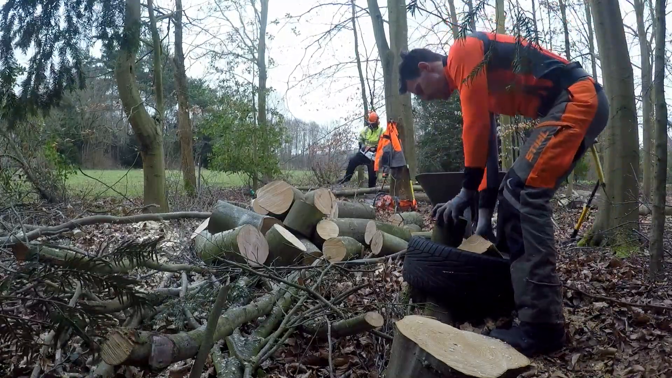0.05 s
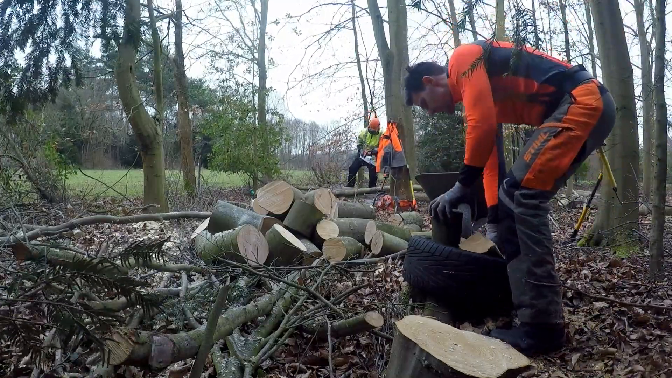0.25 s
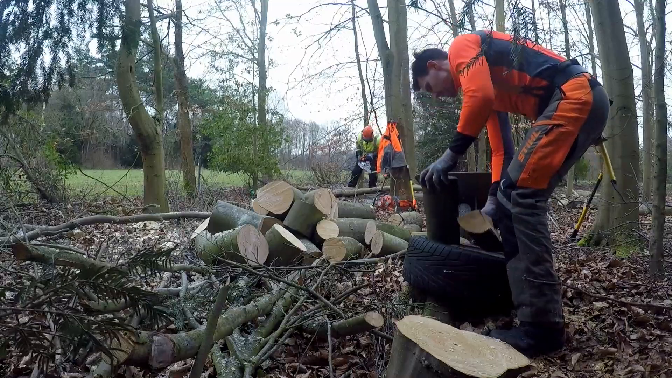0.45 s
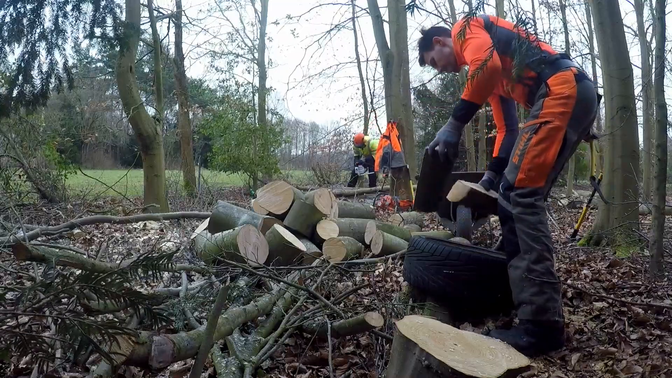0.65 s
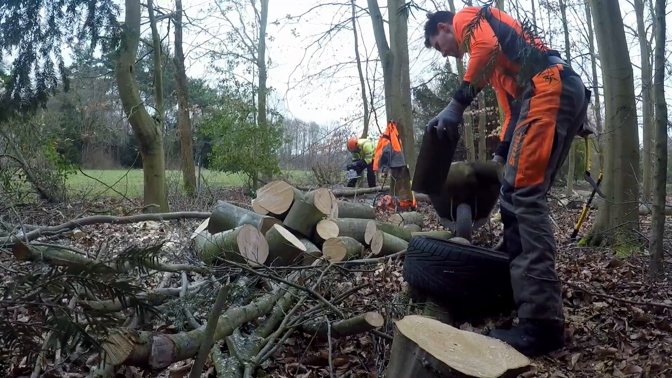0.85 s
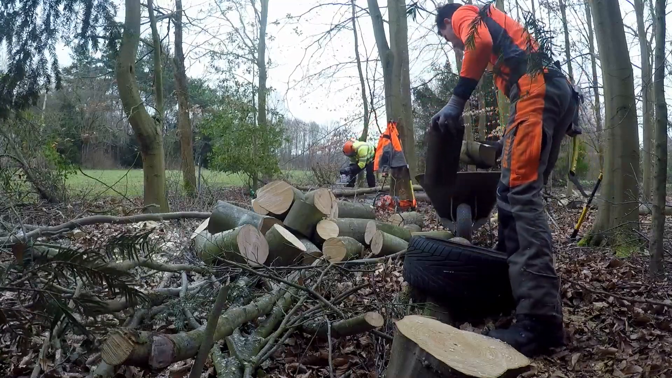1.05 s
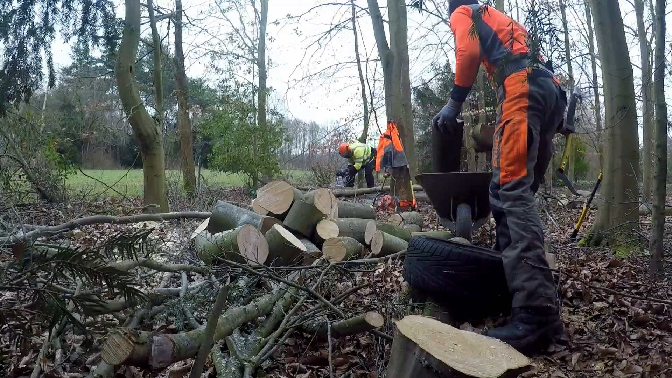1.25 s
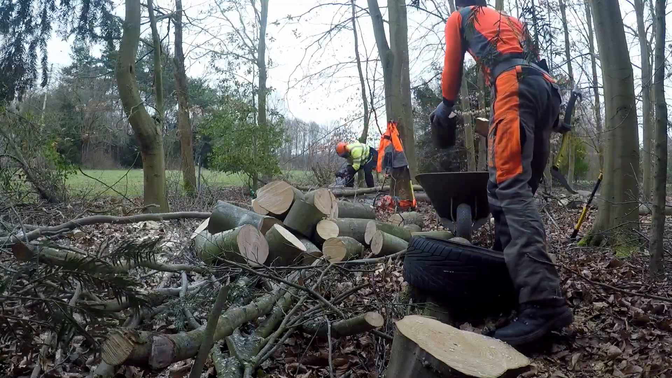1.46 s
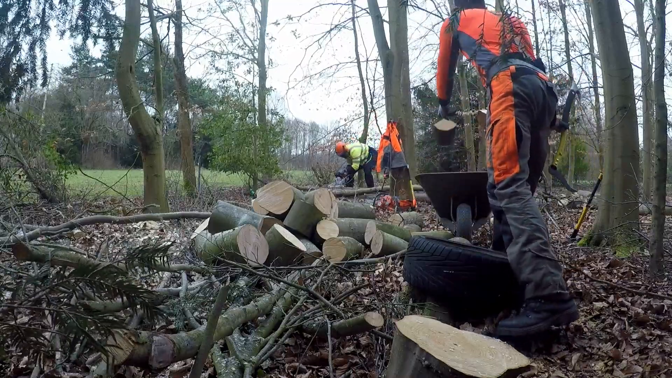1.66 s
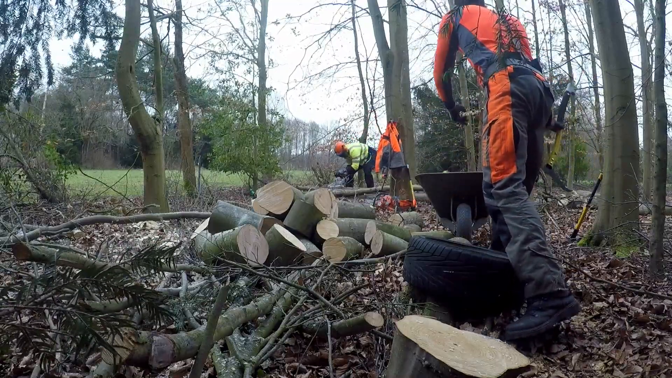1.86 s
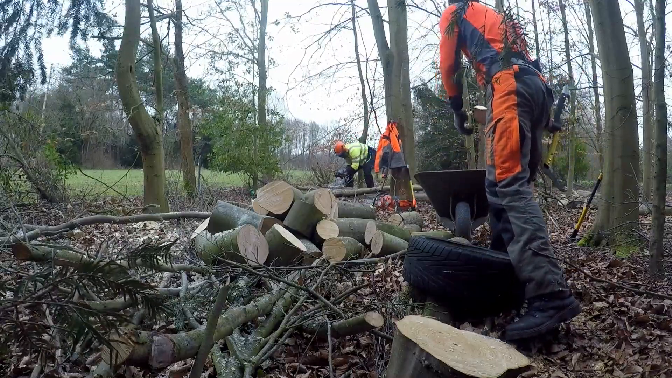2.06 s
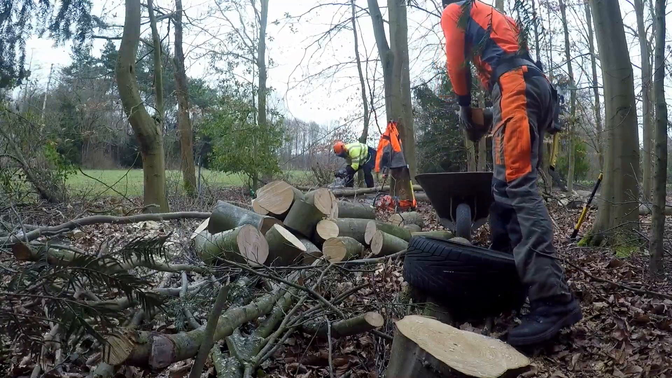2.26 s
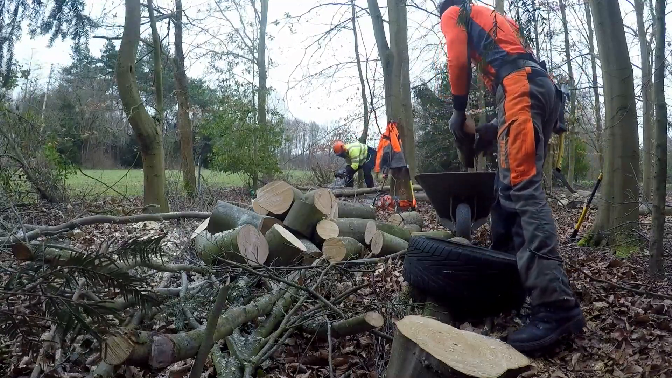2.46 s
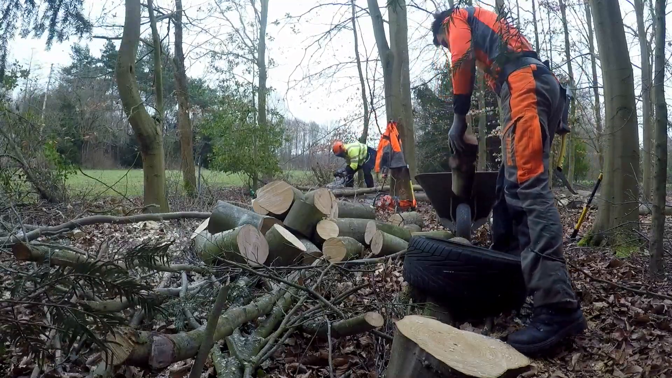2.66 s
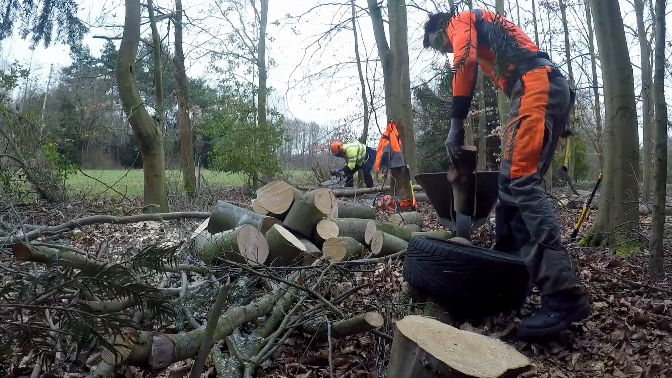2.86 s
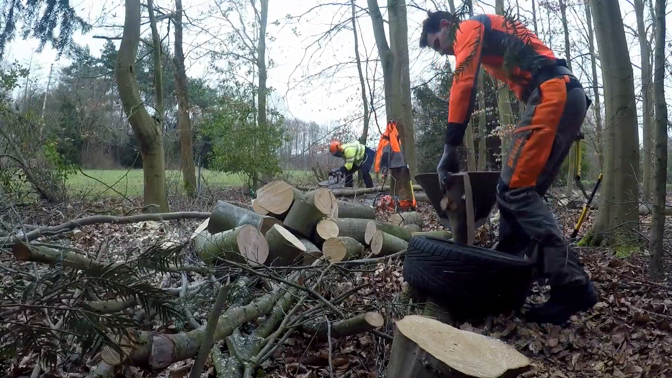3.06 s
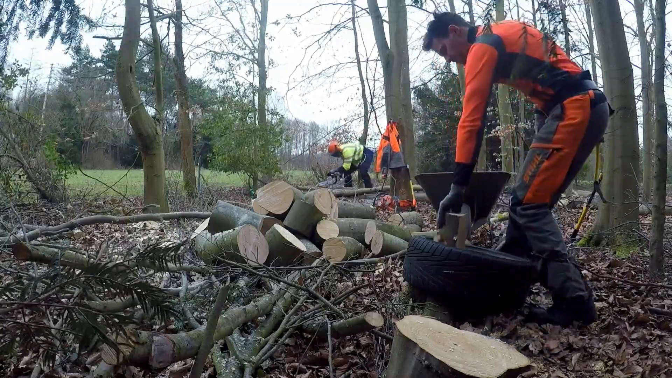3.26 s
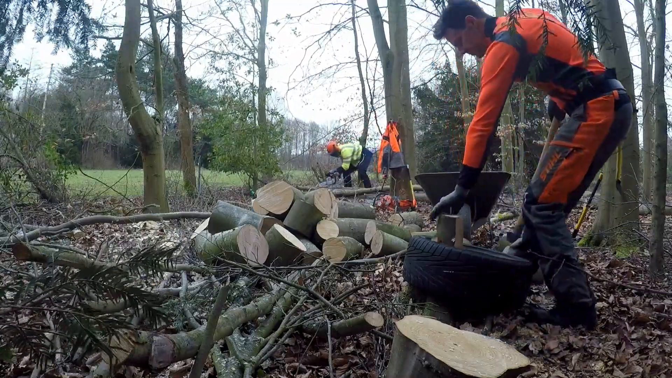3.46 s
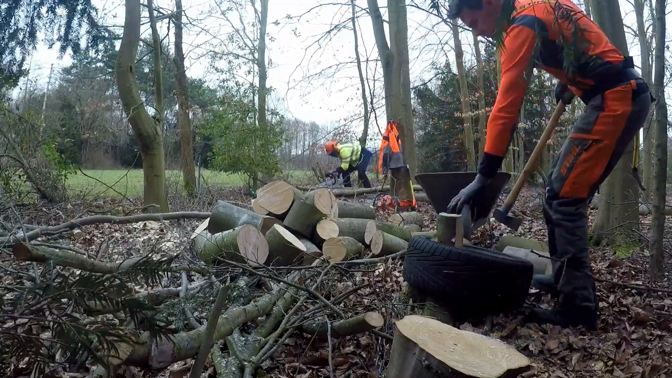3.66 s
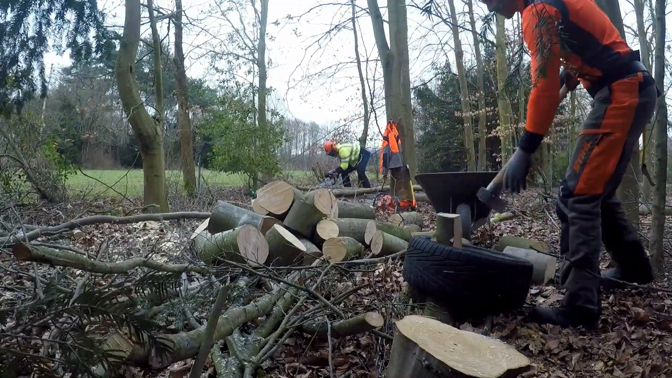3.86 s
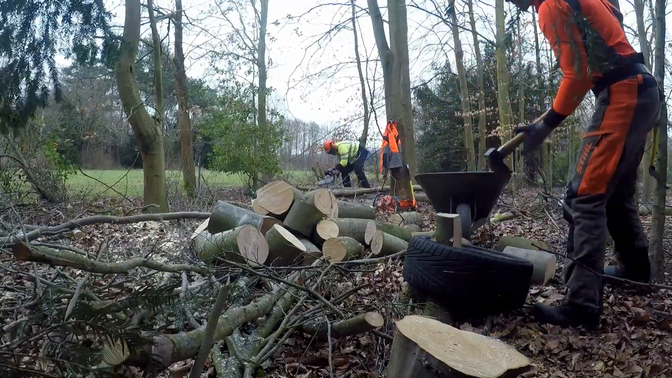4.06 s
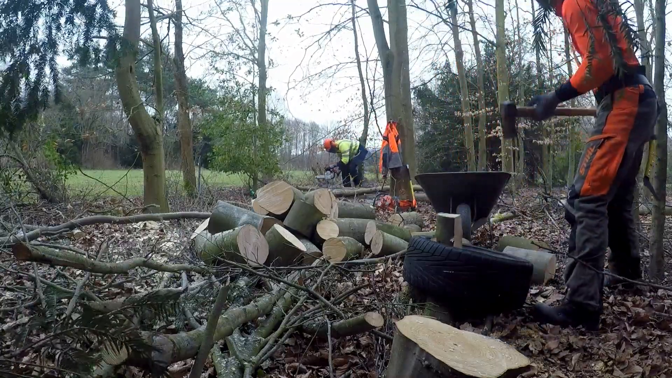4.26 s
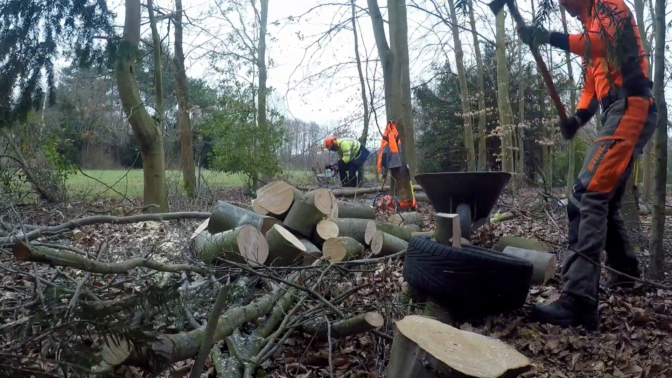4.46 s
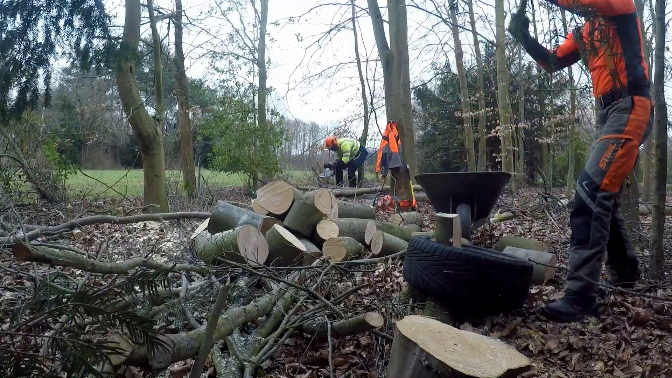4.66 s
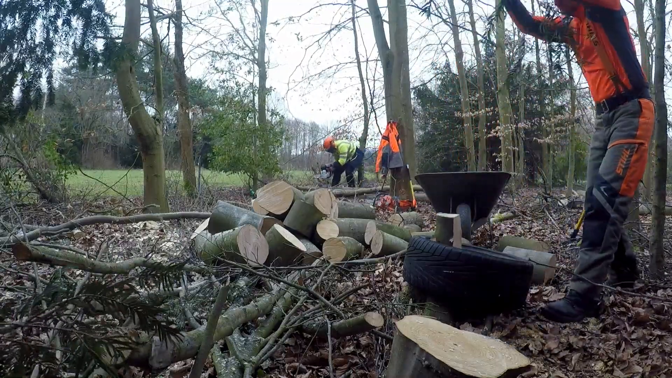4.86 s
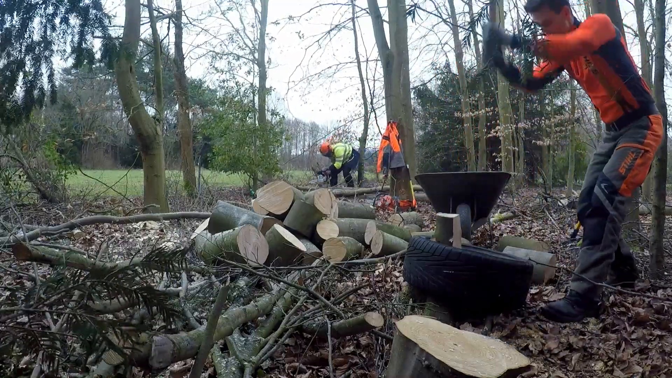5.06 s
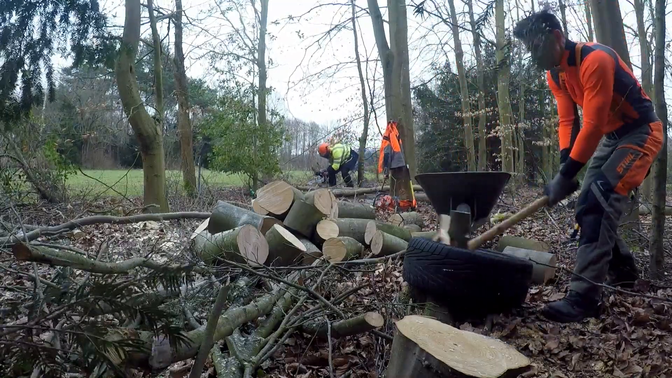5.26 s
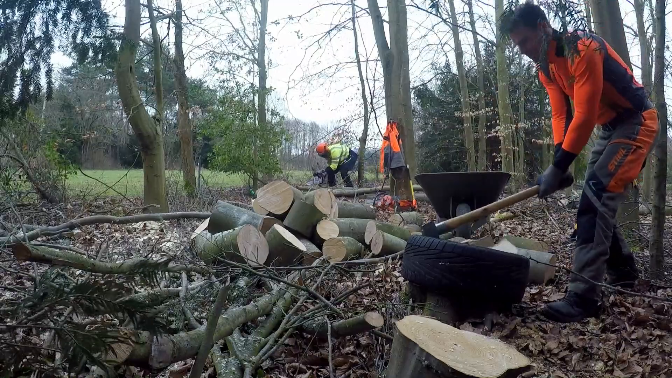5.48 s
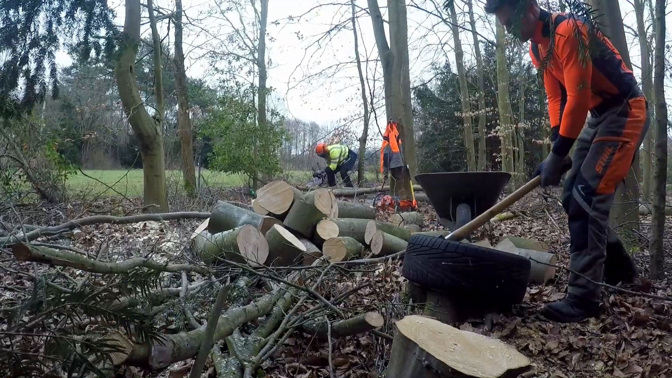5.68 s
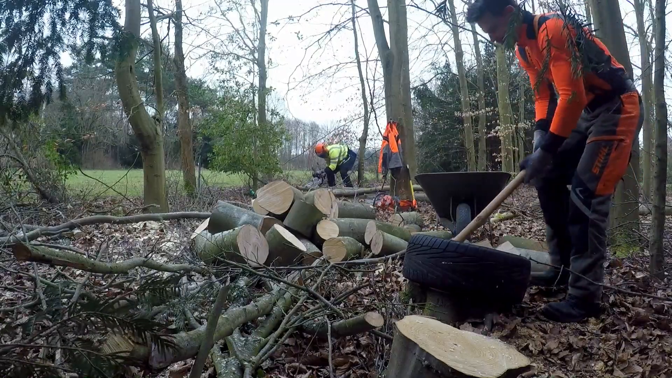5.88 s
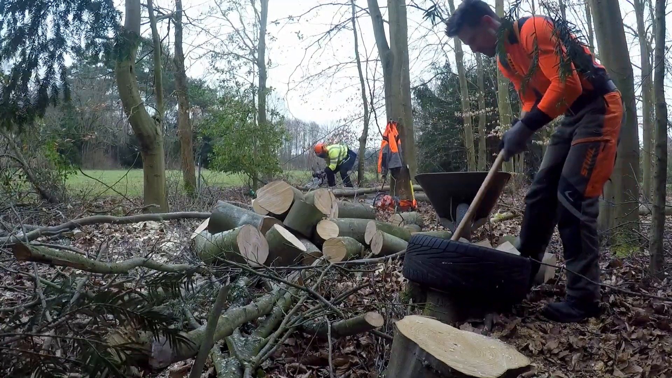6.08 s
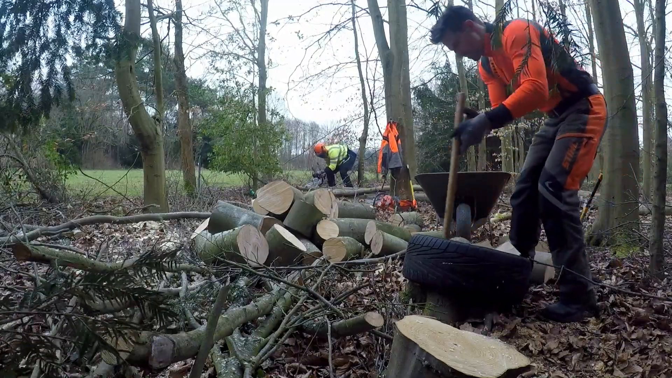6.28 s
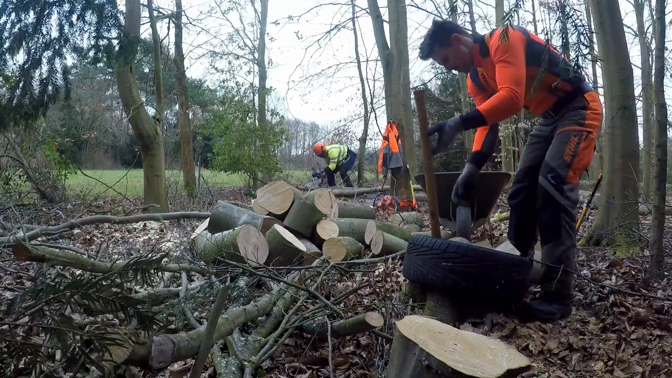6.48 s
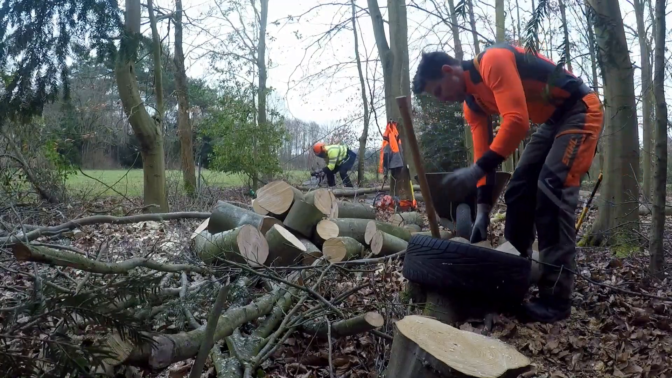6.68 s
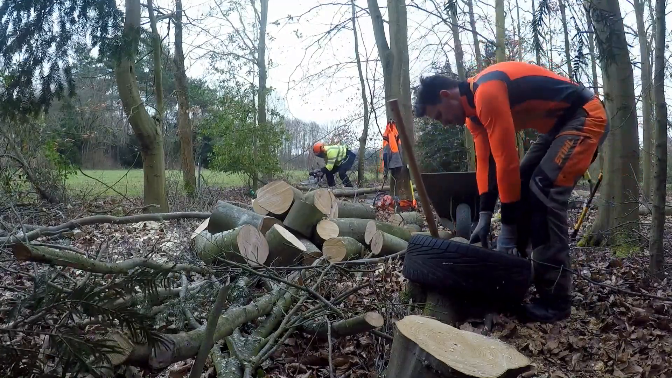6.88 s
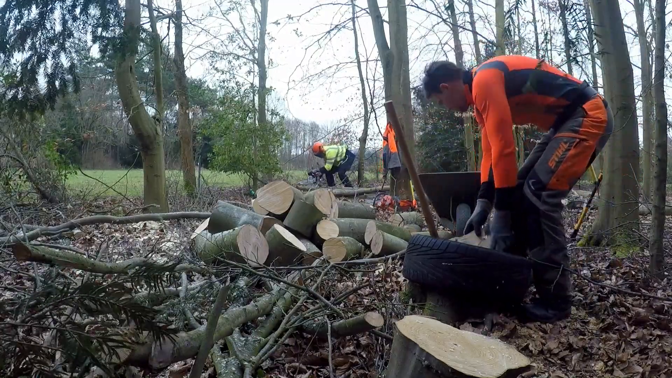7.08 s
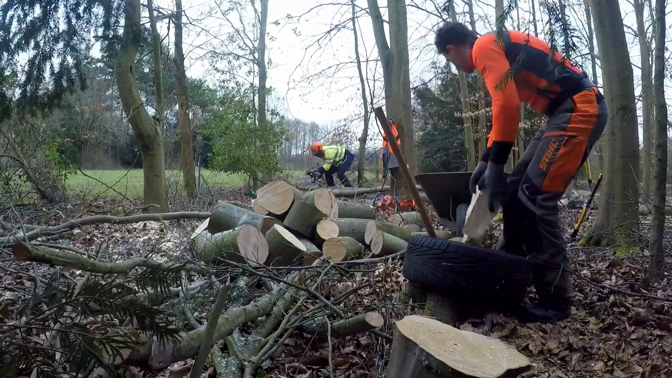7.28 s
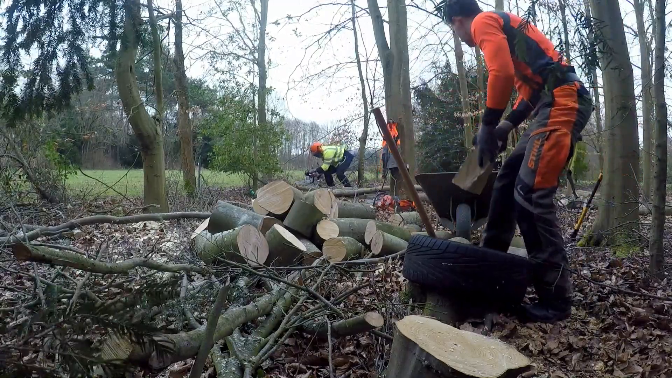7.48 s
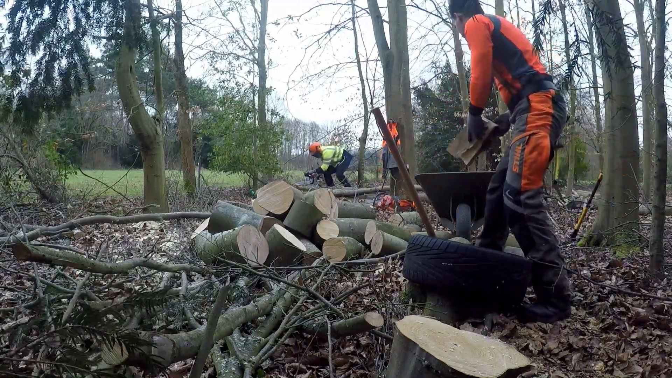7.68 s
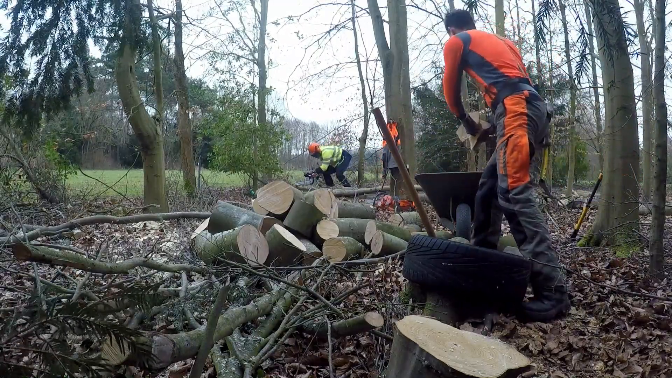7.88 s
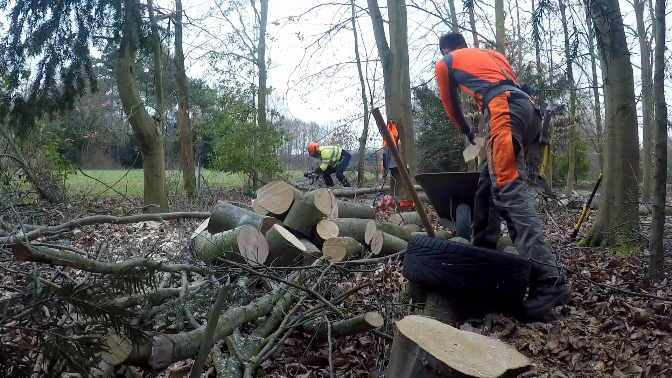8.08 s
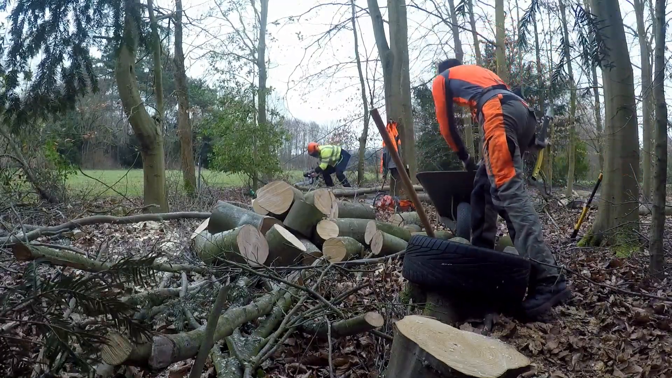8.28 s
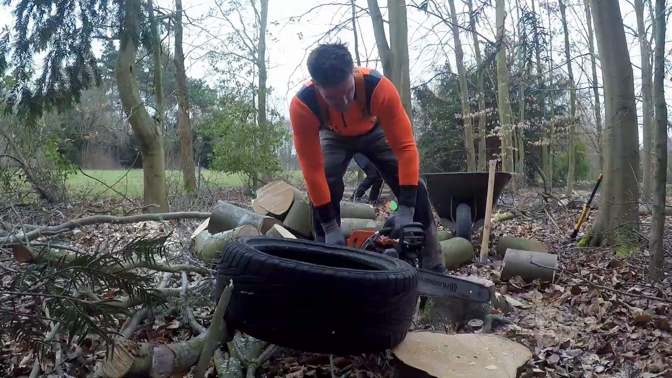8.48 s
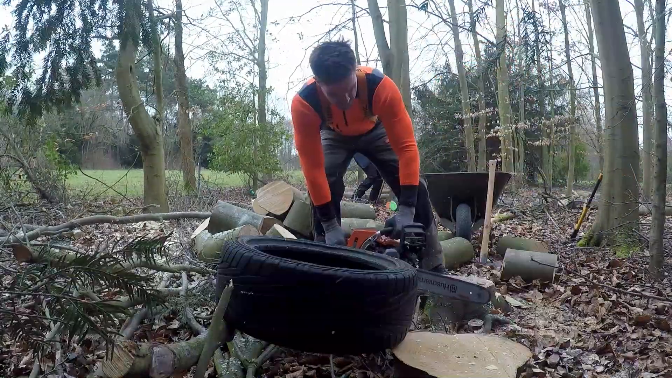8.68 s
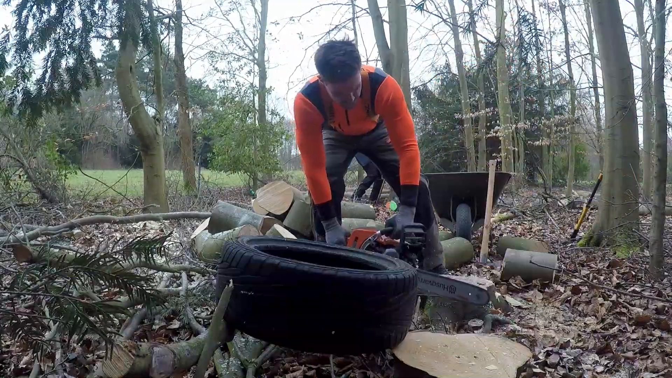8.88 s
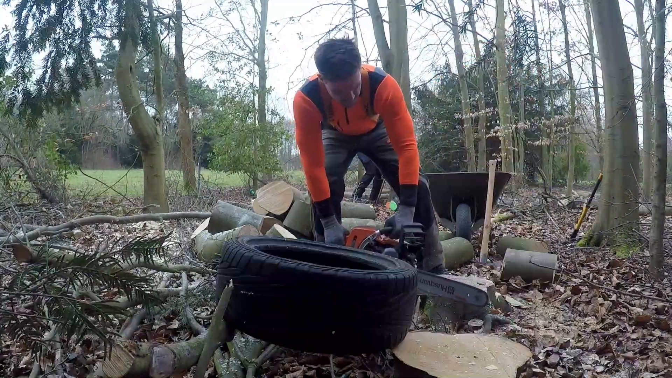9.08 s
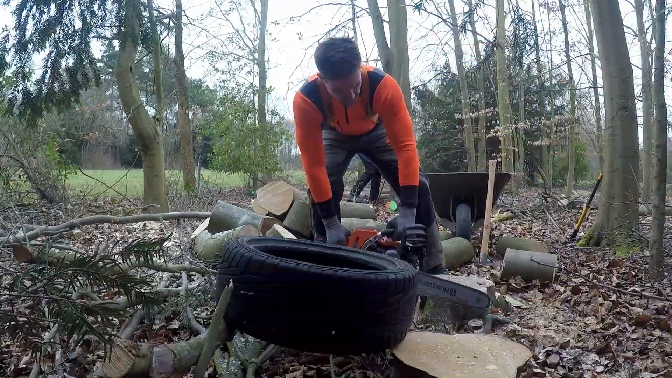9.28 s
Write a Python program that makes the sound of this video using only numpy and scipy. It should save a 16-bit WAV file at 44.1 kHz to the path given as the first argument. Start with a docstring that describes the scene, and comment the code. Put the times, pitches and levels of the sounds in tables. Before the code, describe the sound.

A distant chainsaw sputters and revs as logs thud and an axe splits wood, until a close chainsaw abruptly takes over.

```python
"""In a wood, firewood is being made. A distant two-stroke chainsaw sputters at idle and is blipped four
times: exhaust pulses hum, bark and whine among the trunks, and the chain rasps along. Logs boom into a
wheelbarrow, an axe splits a round held in a tyre, and wind rumbles on the microphone. At the end a close
saw abruptly takes over: it coasts with skipped firings, then opens up to full speed."""
import sys
import numpy as np
from scipy import signal
from scipy.fft import rfft, irfft
from scipy.io import wavfile
from scipy.ndimage import uniform_filter1d

SR = 44100
rng = np.random.default_rng(int(sys.argv[2]) if len(sys.argv) > 2 else 0)


def to_wav(s):
    """Save 16-bit WAV."""
    ch = np.atleast_2d(s).T  # columns
    pcm = np.round(np.clip(ch, -1, 1) * 32767)  # PCM
    wavfile.write(sys.argv[1], SR, pcm.astype(np.int16))


N = 411453
TIME = np.arange(N) / SR


def from_db(db):
    """Decibels to gain."""
    return 10 ** (np.asarray(db) / 20)


def rms_one(x):
    """Scale to rms 1."""
    return x / np.sqrt(np.mean(x ** 2) + 1e-20)


def levelled(x):
    """Ride the gain to hold the running rms at 1."""
    return x / np.sqrt(np.abs(uniform_filter1d(x ** 2, SR // 10)) + 1e-12)


def curves(rows, control=TIME):
    """One curve per column after the first, which is looked up by the control signal."""
    breakpoints, *columns = np.transpose(rows)
    return [np.interp(control, breakpoints, column) for column in columns]


def noise():
    """White noise."""
    return rng.standard_normal(N)


def drift(rate_hz):
    """Slow random modulation, gliding between values of spread 1."""
    return np.interp(TIME * rate_hz, np.arange(8000), rng.standard_normal(8000))


def coloured(x, spectrum, size=4096):
    """Minimum-phase EQ of unit energy, falling 18 dB an octave above its last point."""
    hz, db = np.transpose(spectrum)
    grid = np.maximum(np.fft.rfftfreq(size, 1 / SR), 1)
    skirt_db = -18 * np.log2(np.maximum(grid / hz[-1], 1))
    gain = from_db(np.interp(np.log(grid), np.log(hz), db) + skirt_db)
    cepstrum = irfft(np.log(gain))
    response = irfft(np.exp(rfft(2 * cepstrum[:size // 2], size)))
    return signal.oaconvolve(x, response / np.linalg.norm(response))[:N]


def resonate(x, modes):
    """Ring a bank of parallel resonators."""
    out = 0
    for hz, width, db in modes:
        r = np.exp(-np.pi * width / SR)
        feedback = [1, -2 * r * np.cos(2 * np.pi * hz / SR), r * r]
        out = out + from_db(db) * (1 - r * r) / 2 * signal.lfilter([1, 0, -1], feedback, x + 1e-18)
    return out


def add(track, t, sound):
    """Mix a sound in at t seconds."""
    at = max(round(t * SR), 0)
    track[at:at + len(sound)] += sound[:N - at]


def burst(db, t60):
    """Noise with a hard attack that dies away."""
    age = TIME[:SR // 2]
    return from_db(db - 60 * age / t60) * rng.standard_normal(len(age))


def thud(hz, db, swell_s):
    """A hollow note that peaks after twice swell_s and dies within a few cycles."""
    age = TIME[:SR // 4]
    rise = age / (2 * swell_s)
    return from_db(db) * (rise * np.exp(1 - rise)) ** 2 * np.sin(2 * np.pi * hz * age)


def among_trees(x, wet_db, t60, count=70):
    """Trunks and ground send back many faint echoes."""
    delay = np.minimum(t60, .49) * rng.uniform(.02, 1, count)
    echoes = np.zeros(SR // 2)
    echoes[(delay * SR).astype(int)] = from_db(-60 * delay / t60) * rng.choice([-1, 1], count)
    return x + from_db(wet_db) * signal.oaconvolve(x, echoes / np.linalg.norm(echoes))[:N]


# swell of the wind bed: t/s, level/dB
WIND_SWELL = [(0, -38.5), (.6, -41), (1.85, -77), (2.1, -31.5), (2.8, -37.5), (3.3, -28.5), (5.3, -24.5),
              (6.7, -30.5), (7.4, -34), (8.3, -23), (9.0, -39)]
# rumble EQ: f/Hz, level/dB
WIND_EQ = [(15, -5), (35, 5.5), (80, 8.5), (140, 2), (220, -2.5), (320, -16.5), (600, -48.5)]

def wind():
    """Wind buffets the microphone with a lumpy low rumble."""
    wind_db, = curves(WIND_SWELL)
    lumps_db = 3.2 * drift(16)
    return from_db(wind_db + lumps_db) * rms_one(coloured(noise(), WIND_EQ))


def bumps(count=14, from_s=4.2, to_s=7.1):
    """Boots and wood bump lightly at random moments; the higher the note, the softer."""
    out = np.zeros(N)
    for k, (late, octaves) in enumerate(rng.uniform(-1, 1, (count, 2))):
        t = from_s + (to_s - from_s) * (k + .5 + .5 * late) / count
        add(out, t, thud(hz=173 * 2 ** octaves, db=-21.5 - 5 * octaves, swell_s=.0068))
    return out


# logs hitting the wheelbarrow: t/s, level/dB
LANDINGS = [(0.199, -13), (0.273, -6), (0.364, -9), (1.923, -12), (1.954, -3.5), (2.13, -7.5), (2.169, -8),
            (8.252, -10.5), (8.282, -8.5), (8.326, -5)]

def wheelbarrow(hits=3, tray_hz=197.5, bounce_s=.038, bounce_loss_db=7.5):
    """Each log booms in the hollow tray and bounces, softer every time."""
    out = np.zeros(N)
    for t, db in LANDINGS:
        for k, (late, detune) in enumerate(rng.standard_normal((hits, 2))):
            boom = thud(tray_hz * (1 + .05 * detune), db - k * bounce_loss_db, swell_s=.0055)
            add(out, t + k * bounce_s * (1 + .104 * late), boom)
    return out


# heavy low hits: t/s, f/Hz, level/dB, swell/s
THUMPS = [(3.243, 304, -6, 0.0014), (3.259, 93.4, -4.5, 0.0045), (4.015, 154, -6.5, 0.0031),
          (4.593, 131, -6.5, 0.0011), (4.685, 118, -7, 0.001), (4.755, 126, -7, 0.0015),
          (5.244, 295, -4, 0.00091), (5.26, 99, -4, 0.0056), (5.306, 95, -13.5, 0.0053),
          (5.396, 89.5, -10, 0.0067), (5.511, 406, -29.5, 0.0036), (5.619, 403, -30.5, 0.0058),
          (5.812, 86, -8.5, .007), (6.631, 135, -14.5, 0.0046)]

def log_thumps(rebound_s=.045, rebound_loss_db=11.5):
    """Wood thuds on block, tyre and ground and rebounds once."""
    out = np.zeros(N)
    for t, hz, db, swell_s in THUMPS:
        add(out, t, thud(hz, db, swell_s))
        add(out, t + rebound_s, thud(hz, db - rebound_loss_db, swell_s))
    return out


# wood-on-wood knocks: t/s, level before filtering/dB, t60/s, low-pass f/Hz
KNOCKS = [(0.274, -12.5, 0.37, 1840), (1.927, -9.5, 0.5, 2660), (1.953, -23, 0.85, 1380),
          (3.243, -6, 0.068, 860), (4.017, -16.5, 0.12, 596), (5.271, -14, 0.041, 1900),
          (8.25, -10, 0.49, 1500), (8.273, -8.5, 0.17, 2170), (8.308, -10.5, 0.3, 1300)]
# woody body EQ: f/Hz, level/dB
WOOD_EQ = [(120, -11.5), (250, 16), (450, 3), (620, 9.5), (800, 5), (1020, 0), (1300, 4), (2000, -4.5),
           (5000, 4), (9000, -2.5)]

def log_clatter():
    """Wood knocks on wood in dull bursts of noise."""
    out = np.zeros(N)
    for t, db, t60, top_hz in KNOCKS:
        lowpass = signal.butter(3, top_hz, fs=SR, output="sos")
        add(out, t, signal.sosfilt(lowpass, burst(db, t60)))
    return coloured(out, WOOD_EQ)


# ring of the axe head and the round: f/Hz, width/Hz, level/dB
AXE_MODES = [(398, 230, -3), (630, 580, -0.5), (1570, 220, -1), (1900, 230, -2), (2680, 270, 0.5),
             (3680, 420, -4.5), (6240, 90, -4)]
# EQ of the splitting crack: f/Hz, level/dB
CRACK_EQ = [(150, -15), (400, 0), (1000, -5), (1500, 4), (3000, -9), (4500, -9), (6000, 2), (7500, -4),
            (10500, -30), (13000, -29), (15500, -30)]

def axe(split_s=5.2455):
    """A ringing crunch swells as the blade bites, then the round parts with one crack."""
    since = TIME - split_s
    fade = np.maximum(-since / .08, since / .045)   # 60 dB up in 80 ms, down in 45 ms
    tearing = from_db(-60 * np.minimum(fade, 2))
    ring = rms_one(resonate(resonate(noise(), AXE_MODES), AXE_MODES))
    crunch = from_db(-11.5) * tearing * ring
    snap = np.zeros(N)
    add(snap, split_s, from_db([6.5]))   # one-sample click
    add(snap, split_s, burst(-13, t60=.012))
    return among_trees(crunch + coloured(snap, CRACK_EQ), wet_db=-22, t60=.2)


def revolutions(speed):
    """Samples at which the exhaust port opens, and the share of the turn gone since."""
    turns = np.cumsum(speed) / SR
    return np.flatnonzero(np.diff(np.floor(turns))) + 1, turns % 1


def pulses(at, strength, rough_db):
    """One exhaust pulse a revolution, each a little different in level."""
    out = np.zeros(N)
    out[at] = strength * from_db(rough_db * noise()[:len(at)])
    return out


# throttle blips: open t/s, shut t/s, top speed/(rev/s), coast to half speed/s, treble trim/dB
BLIPS = [(1.882, 2.54, 168, 0.78, 0), (3.587, 3.94, 175.3, 0.68, 0), (5.936, 6.438, 156, .772, -1.5),
         (7.821, 8.299, 179, 0.56, -.5)]
# the clutch lets go and the chain rests: from t/s, to t/s, duck of its ring/dB
CHAIN_RESTS = [(-.2, 1.277, 7.5), (5.257, 5.962, 9.5), (7.675, 7.87, 7)]
IDLE_SPEED, CREEP_SPEED = 51., 56.   # rev/s with the chain still, and with the clutch dragging it

def far_controls(clutch_s=.08, ease_power=12):
    """Crank speed, throttle and chain duck: the throttle revs the engine up, drag coasts it down."""
    duck_db = sum(db * ((TIME > start) & (TIME < end)) for start, end, db in CHAIN_RESTS)
    clutch_samples = int(clutch_s * SR)
    idle = uniform_filter1d(np.where(duck_db > 0, IDLE_SPEED, CREEP_SPEED), clutch_samples)
    speed, throttle = idle, np.zeros(N)
    for opens, shuts, top, halving_s, _ in BLIPS:
        progress = np.clip((TIME - opens) / (shuts - opens), 0, 1)
        # a straight climb that rounds off just before the top
        climb = (ease_power * progress - progress ** ease_power) / (ease_power - 1)
        start = np.interp(opens, TIME, speed)
        slowing = 1 + np.maximum(TIME - shuts, 0) / halving_s   # drag grows with speed squared
        blip = (start + (top - start) * climb) / slowing
        speed = np.where(TIME < opens, speed, np.maximum(blip, idle))
        throttle += (TIME > opens) * (1 - progress ** ease_power)
    return speed, uniform_filter1d(throttle, SR // 20), uniform_filter1d(duck_db, clutch_samples)


# sputtering spells at idle: first t/s, last t/s, firings, level/dB
SPUTTERS = [(0.056, 0.478, 6, -23), (0.573, 0.943, 6, -26), (1.005, 1.213, 4, -25),
            (1.266, 1.375, 3, -22.5), (1.463, 1.756, 4, -24.5), (3.389, 3.533, 3, -28.5),
            (4.653, 4.903, 3, -24), (5.586, 5.881, 4, -30), (7.114, 7.358, 3, -27.5)]
# EQ of one spit: f/Hz, level/dB
POP_EQ = [(300, 3), (1200, -4.5), (2700, 9.5), (4000, 8), (6200, 4.5), (7200, -8), (11000, -19.5),
          (12500, -18), (15500, -18)]

def idle_pops(catch_s=.036, t60=.048):
    """At idle only the odd turn fires, with a short spit; one more comes as each blip catches."""
    spits = np.zeros(N)
    for first, last, firings, db in SPUTTERS:
        for t in np.linspace(first, last, round(firings)):
            add(spits, t, burst(db - rng.uniform(0, 2), t60))
    for opens, *_ in BLIPS:
        add(spits, opens + catch_s, burst(-22, t60))
    scattered = among_trees(coloured(spits, POP_EQ), wet_db=-2, t60=.06)
    return among_trees(scattered, wet_db=-13.5, t60=.23)


# exhaust mix, throttle shut: speed/(rev/s), hum level/dB, bark level/dB, whine level/dB
EXHAUST_MIX = [(50, -35.5, -47.5, -47), (78, -43.5, -42, -38.5), (124, -33, -37.5, -31.5),
               (163.3, -21, -33.5, -29)]
# base mix of the cutting gear: speed/(rev/s), rasp level/dB, chain level/dB
GEAR_MIX = [(56, -35, -32.5), (92.4, -34, -34), (122.5, -29, -30), (163, -25, -25.5)]
# the slower the engine, the rougher: speed/(rev/s), pulse level spread/dB
ROUGHNESS = [(50, 3.5), (80, 3), (120, 1.1), (165, .5)]
# EQs of the far saw's muffler hum, bark, whine and rasp: f/Hz, level/dB
FAR_HUM_EQ = [(40, -32), (100, -20), (135, -1), (170, 0), (250, -5), (330, -15), (450, -28), (900, -50)]
FAR_BARK_EQ = [(250, -17), (420, -10), (600, 0), (820, 2), (1100, -8), (1400, -4), (2000, -6),
               (5000, -54.5)]
FAR_WHINE_EQ = [(700, -20.5), (1100, -9.5), (1400, -1.5), (1800, 2), (2300, -5.5), (2800, -2.5),
                (3250, -23), (4300, 0.5), (6000, -12.5), (8000, -27.5)]
FAR_RASP_EQ = [(300, -11.5), (700, -9), (1400, -0.5), (1800, -3.5), (2600, 1), (3200, -1), (4400, -18),
               (5300, -4), (6200, -1.5), (7100, -16.5), (8600, -20), (9500, -29.5), (11400, -31.5),
               (12200, -18), (14000, -23), (15500, -32)]
# ring of chain, bar and cooling fins: f/Hz, width/Hz, level/dB
CHAIN_MODES = [(3442, 25, 0), (3738, 55, -1), (3860, 70, -6), (4160, 70, -3), (4235, 80, 0),
               (4370, 130, -6), (4550, 130, -6), (4900, 120, -11), (5210, 80, -12), (5780, 200, -13)]
FULL_SPEED = 165   # rev/s

def far_saw(fan_orders=(16, 18, 19, 21)):
    """Exhaust pulses hum in the muffler, bark and whine; gas and chain rasp in time with them."""
    speed, throttle, duck_db = far_controls()
    rasp_db, chain_db = curves(GEAR_MIX, speed)
    hum_db, bark_db, whine_db = curves(EXHAUST_MIX, speed)
    treble_db, = curves([(shuts, db) for _, shuts, _, _, db in BLIPS])
    rough_db = curves(ROUGHNESS, speed)[0] * (1 - .6 * throttle)   # an open throttle evens the firing
    at, turn = revolutions(speed + .25 * rough_db * drift(25))
    # with the throttle shut, uneven running also blows loose gas between the pulses
    exhaust = pulses(at, 1, rough_db[at]) + .008 * rough_db * (1 - throttle) * noise()
    muffled = coloured(among_trees(exhaust, wet_db=-4, t60=.09), FAR_HUM_EQ)
    # the throttle swells the hum most while the crank is still slow
    hum = from_db(hum_db + 4 * throttle * FULL_SPEED / speed) * levelled(muffled)
    # nearby ground and stems blur each pulse, farther trunks trail the pitch
    scattered = among_trees(exhaust, wet_db=-2, t60=.05)
    outdoors = among_trees(scattered, wet_db=-13, t60=.35)
    bark = from_db(bark_db + 7.5 * throttle) * levelled(coloured(outdoors, FAR_BARK_EQ))
    whine = from_db(whine_db + 2 * throttle) * levelled(coloured(outdoors, FAR_WHINE_EQ))
    # the flywheel fan sings at high multiples of the crank speed
    vanes = sum(np.sin(2 * np.pi * k * turn) * from_db(3 * drift(20)) for k in fan_orders)
    fan_gain = from_db(whine_db - 4) * (speed / FULL_SPEED) ** 2
    fan = fan_gain * levelled(among_trees(vanes, wet_db=-4, t60=.25))
    throb = .8 + np.exp(-turn / .22)   # the noise surges once a turn
    rasp_gain = from_db(rasp_db - .6 * duck_db + .8 * throttle)
    rasp = rasp_gain * levelled(coloured(throb * noise(), FAR_RASP_EQ))
    # each part of the cutting gear rattles with a strength that wanders
    rattle = sum(resonate(throb * noise(), [mode]) * from_db(3.5 * drift(8)) for mode in CHAIN_MODES)
    chain_band = signal.butter(3, [2800, 6500], "band", fs=SR, output="sos")
    chain = from_db(chain_db - duck_db + 3 * throttle) * levelled(signal.sosfilt(chain_band, rattle))
    return hum + bark + from_db(treble_db) * (whine + fan + rasp + chain)


# the close saw's crank coasts, then revs up: t/s, speed/(rev/s)
NEAR_SPEED = [(8.45, 150), (8.51, 128), (8.566, 120), (8.676, 109), (8.854, 107.9), (8.996, 149),
              (9.098, 165.0), (9.196, 179), (9.33, 177.0)]
# its fader moves: t/s, hum level/dB, bark level/dB, rasp level/dB
NEAR_MIX = [(8.45, -14, -23.5, -24), (8.55, -14, -24.5, -26), (8.7, -13.5, -24, -26),
            (8.86, -13.5, -22.5, -26), (8.93, -11, -21, -24), (9.02, -9, -20.5, -24.5),
            (9.12, -9.3, -20, -24), (9.2, -9.2, -18.8, -23), (9.33, -9.8, -19.3, -23.5)]
# how often it fires: t/s, share of turns/0-1
NEAR_FIRING = [(8.45, 0.38), (8.6, 0.4), (8.69, .34), (8.72, 0.49), (8.86, 0.4), (8.88, 0.99)]
# EQs of its muffler hum, bark and rasp: f/Hz, level/dB
NEAR_HUM_EQ = [(40, -13), (110, 16), (180, 5), (270, 7.5), (360, -8), (500, -13.5), (900, -60)]
NEAR_BARK_EQ = [(250, -18), (520, -1), (720, -3), (900, 1), (1070, 3), (1270, -7), (1600, -1.5), (1800, -5),
                (2150, 2.5), (2700, -6), (3300, -9), (3900, 0), (6200, -14), (8000, -32)]
NEAR_RASP_EQ = [(1200, -10), (2400, -6), (3300, -12.5), (3850, -2.5), (4250, -8), (4750, -14), (5050, -7),
                (5500, -12.5), (6250, -6.5), (7200, -18.5), (9000, -32), (11300, -43), (12300, -19),
                (15500, -36)]
NEAR_FROM_S = 8.448

def near_saw(jet_decay_s=.007):
    """Fresh charge builds up over several turns until it fires; at full throttle nearly all fire."""
    speed, = curves(NEAR_SPEED)
    hum_db, bark_db, rasp_db = curves(NEAR_MIX)
    share, = curves(NEAR_FIRING)
    at, _ = revolutions(speed * (TIME > NEAR_FROM_S))
    charge = np.cumsum(share[at])
    fired = np.diff(np.floor(charge), prepend=-1) > 0
    puffs = pulses(at, .5 + fired, rough_db=.3)
    hum = from_db(hum_db) * levelled(coloured(puffs, NEAR_HUM_EQ))
    blasts = pulses(at, .33 + fired, rough_db=1.4 - .7 * share[at])
    # turbulent gas follows each blast, more of it when firings are skipped
    jet = signal.lfilter([1], [1, -np.exp(-1 / (jet_decay_s * SR))], blasts) * noise()
    gas = levelled(blasts) + (1.95 - 1.8 * share) * levelled(jet)
    bark = from_db(bark_db) * levelled(coloured(gas, NEAR_BARK_EQ))
    rasp = from_db(rasp_db) * levelled(coloured(jet + 1.2 * noise(), NEAR_RASP_EQ))
    return hum + among_trees(bark + rasp, wet_db=-17, t60=.15)


def scene():
    """Everything sits in the centre; only the topmost hiss spreads and leans right."""
    crossfade = np.clip((TIME - NEAR_FROM_S) / .0049, 0, 1)
    saws = (1 - crossfade) * (far_saw() + idle_pops()) + crossfade * near_saw()
    logs = wheelbarrow() + log_thumps() + log_clatter()
    mid = saws + logs + bumps() + axe() + wind()
    highpass = signal.butter(4, 10500, "high", fs=SR, output="sos")
    hiss = signal.sosfiltfilt(highpass, mid)
    side = -.33 * hiss + signal.sosfilt(highpass, .9 * hiss * noise())
    return np.array([mid + side, mid - side])


def record(dry):
    """Master chain: cut the deepest bass, clip at full scale, cut the top steeply."""
    low_cut = signal.butter(1, 12, "high", fs=SR, output="sos")
    high_cut = signal.ellip(10, .1, 80, 15500, fs=SR, output="sos")
    clipped = np.clip(signal.sosfilt(low_cut, dry), -1, 1)
    return signal.sosfilt(high_cut, clipped)


dry = scene()
out = record(dry)
to_wav(out)
```